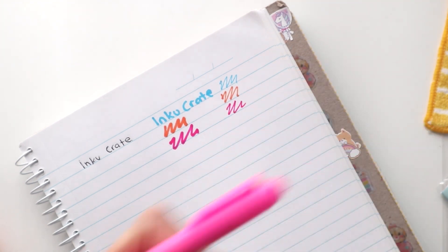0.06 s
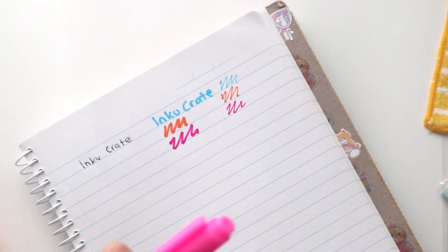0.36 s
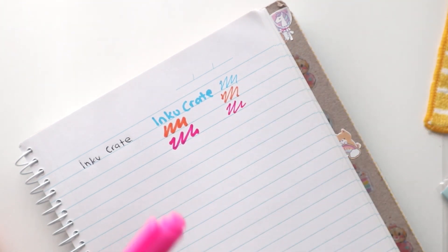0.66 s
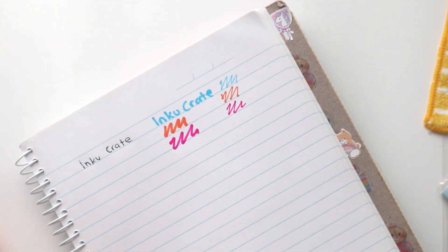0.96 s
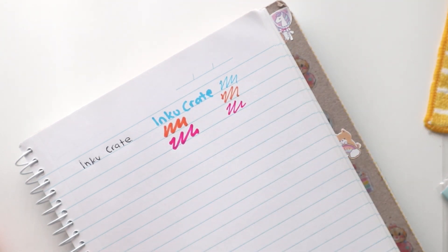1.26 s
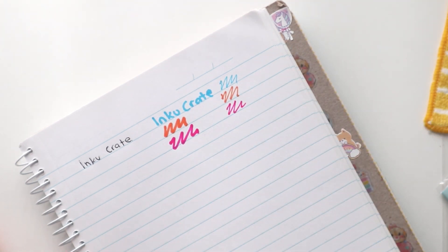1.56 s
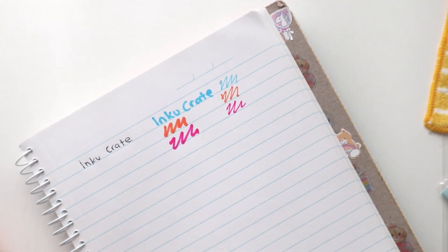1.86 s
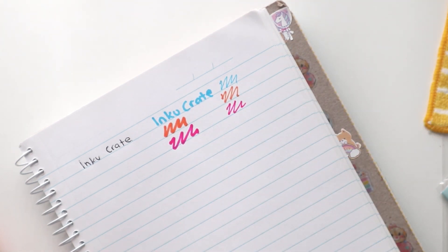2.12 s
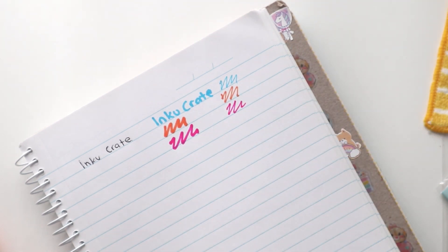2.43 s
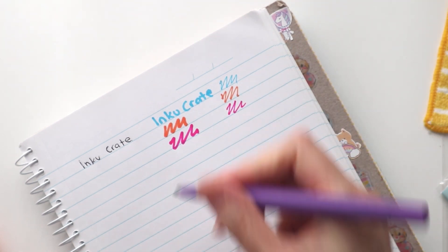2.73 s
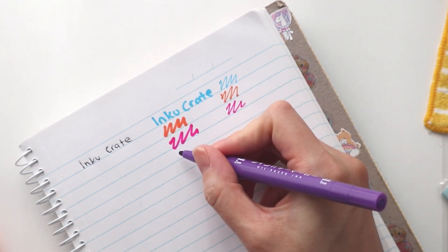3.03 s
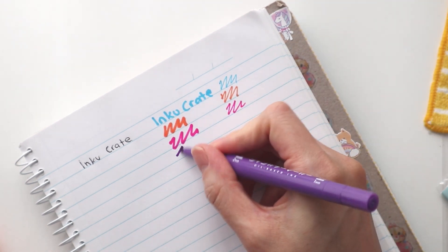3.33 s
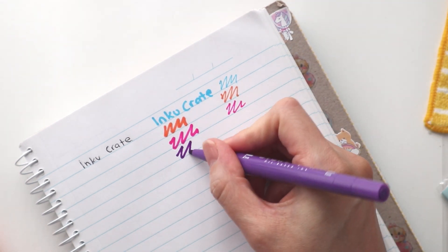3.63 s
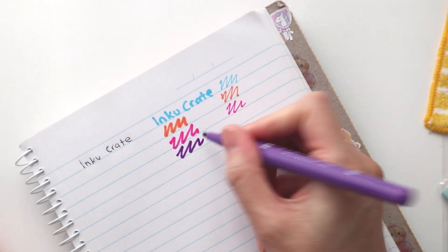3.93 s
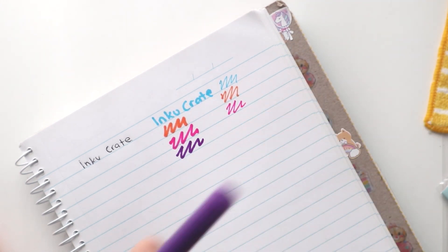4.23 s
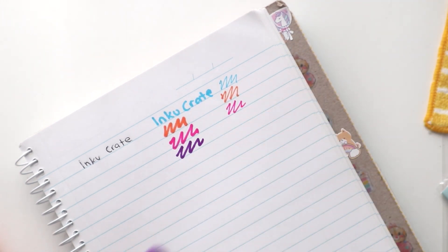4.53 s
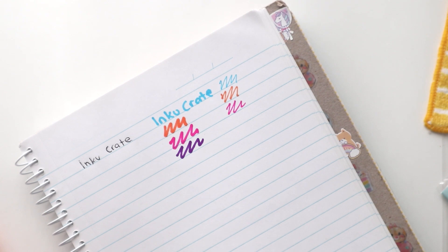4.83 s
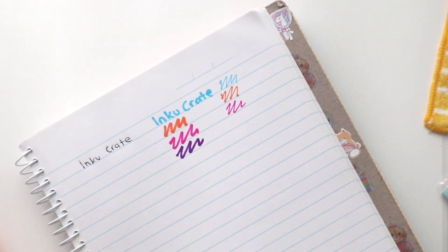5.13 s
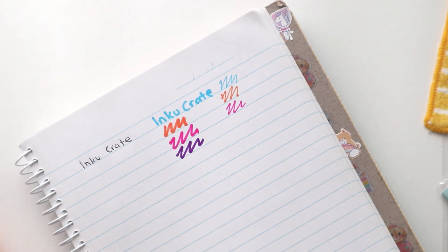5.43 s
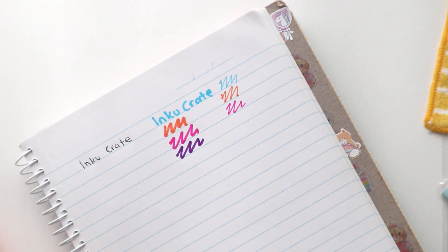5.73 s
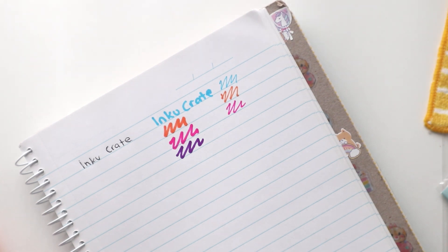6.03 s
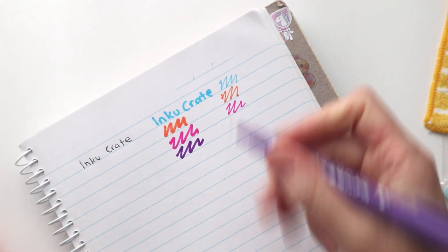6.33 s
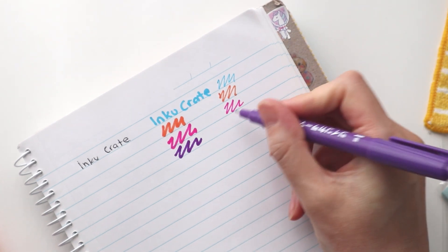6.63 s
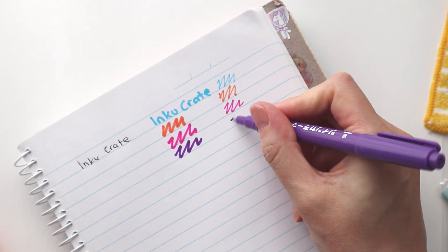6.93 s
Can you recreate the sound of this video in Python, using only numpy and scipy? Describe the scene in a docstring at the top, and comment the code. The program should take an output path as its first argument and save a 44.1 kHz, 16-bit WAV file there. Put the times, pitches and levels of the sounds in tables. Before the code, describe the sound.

Fingers tick lightly on a plastic felt-tip pen. Its cap snaps shut and the pen clatters onto a desk, which rings briefly. A second pen is uncapped, a hand lands softly, and the tip scratches a faint, quick zigzag on notebook paper. That cap snaps shut and a third pen clicks open. Everything is close to a stereo microphone, over the low rumble of a small quiet room.

```python
"""Fingers tick on a plastic felt-tip pen, over the low rumble of a small quiet room.
Its cap snaps shut and the pen clatters down, making the desk ring. A second pen is picked up
and uncapped, scribbles a zigzag as its tip rubs the paper of a notebook, and is capped again.
A third is uncapped. In between, fingers tick and a hand lands softly, close to a stereo camera."""
import sys
import numpy as np
from scipy import signal
from scipy.fft import rfft, irfft
from scipy.io import wavfile
from scipy.ndimage import uniform_filter1d

SR = 44100
rng = np.random.default_rng(int(sys.argv[2]) if len(sys.argv) > 2 else 0)


def dump_mix(stems):
    """Bounce the given channels to the path in sys.argv[1] as a 16-bit WAV at rate SR."""
    frames = np.atleast_2d(stems).T  # one column per channel
    limited = np.clip(frames, -1, 1)  # hard clip at full scale
    pcm = np.round(limited * 32767).astype(np.int16)
    wavfile.write(sys.argv[1], SR, pcm)


N = 311787
TAPS = 16384  # samples used to work out how an object rings
HZ = np.fft.rfftfreq(TAPS, 1 / SR)

# stereo width of sound scattered around the desk: (frequency [Hz], side against middle [dB])
NEAR_WIDTH = [(100, -25.5), (450, -21.5), (1300, -9.5), (2400, -5.5), (4400, 2.5), (12000, 3)]
# tone colour of a pen's plastic barrel: (frequency [Hz], level [dB])
BARREL_COLOUR = [(150, -16), (500, -13), (1200, -0.5), (2500, 7), (5000, 1.5), (8000, -6), (12000, -13),
                 (16000, -32.5)]
# tone colour of a knock on the desk: (frequency [Hz], level [dB])
DESK_COLOUR = [(53, -42), (90, -5), (245, -12.5), (329, 1), (382, -10), (450, -2), (1460, -4), (5940, -25),
               (14500, -61)]


def amp(db):
    """Turns decibels into a gain."""
    return 10 ** (np.asarray(db) / 20)


def unit(x):
    """Scales a sound to an average power of 1."""
    return x / np.sqrt(np.mean(x ** 2) + 1e-20)


def unit_hit(x):
    """Scales a stereo hit to the energy of 10 ms at power 1."""
    return x / np.sqrt((x ** 2).sum() / 2 / (SR / 100))


def read(points, hz):
    """Looks up a table's value at any frequency, on a scale of octaves."""
    known_hz, value = np.transpose(points)
    return np.interp(np.log(hz + 1), np.log(known_hz + 1), value)


def add(mix, s, sound):
    """Mixes a sound in at s seconds."""
    part = mix[:, round(s * SR):][:, :sound.shape[1]]
    part += sound[:, :part.shape[1]]


def pan(left_db):
    """Two gains that make the left side left_db louder than the right."""
    return amp([[left_db / 2], [-left_db / 2]])


def dull(x, above_hz):
    """Softens the treble."""
    return signal.lfilter(*signal.butter(2, above_hz, fs=SR), x)


def wide_noise(size, width):
    """White stereo noise, narrow in the bass and wide in the treble."""
    middle, side = rfft(rng.standard_normal((2, size)))
    spread = amp(read(width, np.fft.rfftfreq(size, 1 / SR)))
    return irfft([middle + spread * side, middle - spread * side] / np.sqrt(1 + spread ** 2), size)


def body(colour, resonances=(), tilt_db=0):
    """How an object answers one sharp tap: a broad colour, with peaks where it rings."""
    power = amp(read(colour, HZ)) ** 2
    for hz, width, db in resonances:
        power += amp(db) ** 2 / (1 + ((HZ - hz) / width) ** 2) ** 2
    octaves = np.log2(np.clip(HZ, 300, 9000) / 1000)
    gain = np.sqrt(power) * amp(tilt_db * octaves)
    log_gain = np.log(np.r_[gain, gain[-2:0:-1]] + 1e-6)
    spectrum = np.exp(np.conj(signal.hilbert(log_gain)))  # nothing sounds before the tap
    return np.fft.ifft(spectrum).real[:TAPS // 2] * np.hanning(TAPS)[TAPS // 2:]


def through(x, response):
    """Gives a sound an object's colour at about the same power."""
    return signal.fftconvolve(x, response[None] / np.linalg.norm(response), axes=1)


def strike(response, rattle_db, rattle_t60):
    """A sharp contact, then rattles and near echoes that fade by 60 dB in rattle_t60 seconds."""
    t = np.arange(TAPS // 4) / SR
    contact = dull(wide_noise(len(t), NEAR_WIDTH), above_hz=13000) * amp(-60 * t / rattle_t60)
    contact *= amp(rattle_db) / np.linalg.norm(contact[0])
    contact[:, 0] += 1  # the first click
    # keep the rattle's fine ripples but leave the broad colour to the object
    margin = TAPS // 64
    spectrum = rfft(np.roll(contact, margin, axis=1), TAPS // 2)
    spectrum /= np.sqrt(uniform_filter1d((abs(spectrum) ** 2).mean(0), size=80))
    sound = signal.fftconvolve(irfft(spectrum)[:, :len(t)], response[None], axes=1)
    return unit_hit(sound[:, margin - 2:])


def ringing(tones):
    """Short tones die away, a little out of step at the two microphones."""
    t, out = np.arange(TAPS) / SR, np.zeros((2, TAPS))
    rise = 1 - np.exp(-t / 0.0003)
    for hz, t60, db in tones:
        lead = min(hz / 4000, 1) * np.pi / 4 * rng.choice([-1, 1])  # up to a quarter cycle apart
        tone = np.sin(2 * np.pi * hz * t + [[lead], [-lead]])
        out += amp(db) * unit_hit(tone * amp(-60 * t / t60) * rise)
    return out


def building_rumble():
    """The building rumbles low and steady, with a faint hiss."""
    # tone colour of the rumble: (frequency [Hz], level [dB])
    colour = [(12, -41.5), (20, -12), (55, -4), (79, -6.5), (107, -11.5), (270, -21), (399, -17.5),
              (1090, -24.5), (5230, -37.5), (12100, -53.5), (16000, -82.5)]
    # stereo width of sound from all around: (frequency [Hz], side against middle [dB])
    width = [(60, -30.5), (110, -13), (200, -1.5), (1300, 4)]
    gain = amp(read(colour, np.fft.rfftfreq(N, 1 / SR)))
    return amp(-52.5) * unit(irfft(rfft(wide_noise(N, width)) * gain, N))


def fingers():
    """Fingers and caps tick and slide on the barrels; the hand cuts the plastic's ring short."""
    # light taps: (time [s], level [dB], brightness [dB per octave], pitch [Hz])
    ticks = [(0.510, -52, -3, 2680), (0.521, -53.5, -2, 2900), (0.6095, -49, -2, 2690),
             (1.3928, -50.5, 6, 5360), (2.2302, -49.5, 1.5, 5150), (2.261, -57, -11, 5230),
             (2.64, -59, -1.5, 3720), (4.631, -53, -5.5, 1970), (4.6945, -47.5, 1.5, 2130),
             (4.789, -56.5, -1, 7100), (5.0781, -52.5, 14, 5400), (5.7639, -46, 5.5, 7240),
             (6.2863, -49.5, -1, 3060)]
    # slides along a barrel: (start [s], end [s], level [dB])
    slides = [(0.595, 0.612, -55), (1.365, 1.416, -65.5), (4.678, 4.713, -49), (5.071, 5.105, -62),
              (5.689, 5.78, -67.5)]
    out = np.zeros((2, N))
    for s, db, tilt_db, hz in ticks:
        t60 = 0.044 * (2000 / hz) ** 1.7  # higher tones die sooner
        add(out, s, ringing([(hz, t60, db - 6.5)]))
        barrel = body(BARREL_COLOUR, tilt_db=tilt_db)
        add(out, s, amp(db) * strike(barrel, rattle_db=2.5, rattle_t60=0.034))
    for start, end, db in slides:
        add(out, start, amp(db) * rub(end - start))
    return out


def friction(seconds, grain_db):
    """Surfaces catch and let go at random, under uneven pressure, as a stroke speeds up and slows."""
    size = round(seconds * SR)
    fast, slow = rng.standard_normal((2, size))
    catches_db = grain_db * unit(uniform_filter1d(fast, size=10))
    pressure_db = 1.4 * unit(uniform_filter1d(slow, size=400))
    speed = abs(signal.windows.tukey(size, 0.61)) ** 0.51
    return unit(wide_noise(size, NEAR_WIDTH) * amp(catches_db + pressure_db) * speed)


def rub(seconds):
    """Skin or plastic slides briefly over a barrel or the page."""
    return through(friction(seconds, grain_db=8), body(BARREL_COLOUR, tilt_db=-3))


def caps():
    """A cap's rim jumps a ridge and strikes again at once; short tones follow the harder click."""
    # caps going on, off, on, off:
    # (time [s], level [dB], wait for second click [s], its level change [dB], rattle [dB])
    snaps = [(1.1153, -24, 0.0014, -3, 7.5), (2.3938, -39, 0.002, 12, -0.5),
             (4.8605, -21.5, .00115, -1.5, 6.5), (6.0442, -31, 0.0019, -3, 0)]
    # tone colour of each snap's crack: (frequency [Hz], level [dB])
    first_shut = [(120, -44), (330, -21), (850, -9), (1500, -4.5), (2700, -3), (3700, -5.5), (5400, -5),
                  (7800, -12.5), (10200, -12), (14500, -28.5)]
    second_open = [(59, -23), (100, -3.5), (467, 1), (760, -8.5), (3590, -3.5), (4520, -7.5), (5600, -3),
                   (8800, -6), (12800, -23.5), (14500, -41)]
    second_shut = [(71, -46), (120, -15.5), (480, -10), (1050, -9), (3000, -1), (4400, -1.5), (5700, -12.5),
                   (9000, -13), (11400, -10.5), (14500, -36)]
    third_open = [(88, -42.5), (150, -7.5), (693, 0), (1150, -8.5), (1840, -8), (6620, -2), (14500, -26.5)]
    # tones heard in each snap: (pitch [Hz], time to fade by 60 dB [s], level [dB])
    first_shut_tones = [(1440, 0.017, -33), (3184, 0.012, -21.5), (4530, .011, -23)]
    second_open_tones = [(462, 0.025, -38.5), (2820, 0.0071, -31.5), (3570, 0.0066, -31),
                         (5060, 0.0076, -35)]
    second_shut_tones = [(877, 0.033, -36), (1725, 0.013, -38.5), (2440, .022, -26.5), (3480, 0.0068, -21),
                         (4140, 0.011, -23), (7450, .006, -22)]
    third_open_tones = [(374, 0.052, -42), (670, 0.014, -37), (1880, 0.015, -42), (4840, 0.0098, -39),
                        (6650, 0.026, -35.5)]
    sounds = [(first_shut, first_shut_tones), (second_open, second_open_tones),
              (second_shut, second_shut_tones), (third_open, third_open_tones)]
    cracks, rings = np.zeros((2, 2, N))
    for (s, db, wait, change_db, rattle_db), (colour, tones) in zip(snaps, sounds):
        shell = body(colour)
        add(cracks, s, amp(db) * strike(shell, rattle_db, rattle_t60=0.0085))
        add(cracks, s + wait, amp(db + change_db) * strike(shell, rattle_db, rattle_t60=0.071))
        add(rings, s + wait if change_db > 0 else s, ringing(tones))
    return cracks, rings


def hand():
    """The soft heel of the hand lands with a low thump while its skin brushes the surface."""
    # landings on notebook and desk: (time [s], level [dB], pitch [Hz])
    thumps = [(1.616, -38.5, 144), (2.878, -36, 104), (6.525, -37.5, 92.6)]
    out, t = np.zeros((2, N)), np.arange(TAPS // 2) / SR
    peak_s, brush_lead_s = 0.0049, 0.054
    swell = t / peak_s * np.exp(1 - t / peak_s)
    for s, db, hz in thumps:
        thump = swell * np.sin(2 * np.pi * hz * t)
        add(out, s, amp(db) * thump[None])
        add(out, s - brush_lead_s, amp(-63.5) * rub(seconds=0.11))
    return out


def desk_knocks():
    """Knocks of a pen or the hand ring the desk; two quick, softer, duller bounces follow each."""
    # a knock of pen or hand on desk or notebook: (time [s], level [dB], brightness [dB per octave])
    knocks = [(1.622, -49, -5), (1.6754, -18.5, 5), (1.7202, -28, -1), (1.7236, -17.5, 0),
              (1.7289, -21, 4.5), (1.7533, -29.5, 3.5), (1.7881, -27, 1), (1.8085, -22.5, 5.5),
              (1.820, -30.5, 2.5), (1.828, -26.5, 0), (1.8667, -33, -0.5), (1.889, -38.5, 0),
              (1.917, -40.5, -4.5), (2.866, -52.5, -0.5), (6.553, -59, 3), (7.0, -57, 3)]
    # where the desk rings: (pitch [Hz], width [Hz], level [dB])
    desk_ring = [(127, 11, -3.5), (181, 25, -6), (340, 14, -1), (451, 26, 3), (574, 90, -6), (660, 24, 1),
                 (1085, 33, 2), (1260, 23.6, 0.5), (1414, 170, -1), (1740, 45, -2.5), (1900, 30, -4.5),
                 (2240, 31, -2.5), (2470, 200, -7), (2940, 270, -11)]
    bounce_s, bounce_db, bounce_tilt_db = 0.0034, -5, -3.5
    out = np.zeros((2, N))
    for s, db, tilt_db in knocks:
        gaps = bounce_s * (1 + 0.4 * rng.uniform(-1, 1, 2))
        # each knock lands on another spot and favours other tones
        spot = [(hz, width, level + 2.5 * rng.uniform(-0.95, 1)) for hz, width, level in desk_ring]
        for bounce, delay in enumerate(np.r_[0, np.cumsum(gaps)]):
            board = body(DESK_COLOUR, spot, tilt_db + bounce * bounce_tilt_db)
            knock = strike(board, rattle_db=3, rattle_t60=0.033)
            add(out, s + delay, amp(db + bounce * bounce_db) * knock)
    return out * pan(left_db=0.7)


def pen_rocking():
    """A lying pen rocks from edge to edge in light hollow taps, each with its own pitch."""
    # taps as a pen settles or is picked up: (time [s], level [dB], pitch [Hz])
    rocks = [(2.040, -56, 1063), (2.234, -45, 222), (2.2435, -48, 1440), (2.2475, -44, 505),
             (2.254, -46, 623), (2.2666, -45.5, 452), (2.274, -47, 650)]
    out, ring_t60 = np.zeros((2, N)), 0.042
    for s, db, hz in rocks:
        add(out, s, amp(db) * strike(body(DESK_COLOUR), rattle_db=2, rattle_t60=0.033))
        add(out, s, ringing([(hz, ring_t60, db)]))
    return out


def paper_grit(seconds):
    """Single paper fibres snap free under the tip, most often in mid-stroke."""
    size = round(seconds * SR)
    peak_snaps_per_s, spread_db = 500, 14
    chance, strength, side = rng.random((size, 3)).T
    speed = np.sin(np.pi * np.arange(size) / size)
    snaps = (chance < speed * peak_snaps_per_s / SR) * amp(spread_db * strength)
    return unit(snaps * np.array([np.cos(np.pi * side), np.sin(np.pi * side)]))


def scribble():
    """The felt tip hisses brightly when pushed up the page and rasps lower when dragged back."""
    # corners of the zigzag, where the tip turns round: (time [s])
    corners = [3.28, 3.374, 3.479, 3.602, 3.712, 3.82, 3.903, 3.977]
    # the up stroke, then the down stroke: (share of pushing [0 to 1], level change [dB])
    directions = [(1, 0.15), (0.14, -0.7)]
    # tone colour of the pushed and the dragged tip: (frequency [Hz], level [dB])
    push_colour = [(410, -1), (700, 2), (756, -5.5), (1490, -2), (1740, 3.5), (3060, -6), (7220, -2.5),
                   (11200, -10.5), (15000, -34)]
    drag_colour = [(410, -41), (700, -22), (1180, 1.5), (1450, -20), (2250, -7), (4380, -9), (6520, -5.5),
                   (12500, -17), (15000, -38)]
    # where the pushed and the dragged tip ring: (pitch [Hz], width [Hz], level [dB])
    push_ring = [(2250, 210, -13), (7180, 560, 4)]
    drag_ring = [(2220, 250, 2.5), (6170, 410, -2)]
    pushed, dragged = body(push_colour, push_ring), body(drag_colour, drag_ring)
    rest_s, typical_stroke_s = 0.019, 0.12
    out = np.zeros((2, N))
    for stroke, (corner, next_corner) in enumerate(zip(corners, corners[1:])):
        start, seconds = corner + rest_s / 2, next_corner - corner - rest_s
        push_share, change_db = directions[stroke % 2]
        # longer strokes are faster and so louder
        db = -52.5 + change_db + 3 * np.log2(seconds / typical_stroke_s)
        add(out, start, amp(db - 6) * through(paper_grit(seconds), pushed))
        for share, tip in ((push_share, pushed), (1 - push_share, dragged)):
            hiss = through(friction(seconds, grain_db=0), tip)
            add(out, start, amp(db) * np.sqrt(share) * hiss)
    return out


def first_echoes(x):
    """Surfaces around the desk throw each sound back with less treble."""
    # one echo per surface: (delay [s], level [dB], left against right [dB])
    echoes = [(0.0068, -18, 4.5), (0.0081, -21.5, -4)]
    out, soft = np.zeros((2, N)), dull(x, above_hz=7500)
    for delay, db, left_db in echoes:
        add(out, delay, amp(db) * pan(left_db) * soft)
    return out


def room_tail(x):
    """Sound lingers in the small room, each frequency dying at its own speed."""
    # how long the room rings: (frequency [Hz], time to fade by 60 dB [s])
    fade_times = [(150, 1), (500, 0.4), (1400, 0.67), (3000, 0.62), (7000, 0.26), (14000, .24)]
    # how strongly the room answers: (frequency [Hz], level [dB])
    levels = [(150, -16), (500, -14.5), (1400, -13), (3000, -13), (4500, -16.5), (7000, -16.5),
              (14000, -21)]
    hz, t, bands = signal.stft(wide_noise(SR * 3 // 4, NEAR_WIDTH), SR, nperseg=256)
    decay = amp(-60 * t / read(fade_times, hz)[:, None])
    decay *= 1 - np.exp(-t / 0.01)  # the echoes take a moment to build up
    energy = (decay ** 2).sum(1, keepdims=True) * SR * t[1]
    decay *= amp(read(levels, hz))[:, None] / np.sqrt(energy)
    tail = signal.istft(bands * decay, SR, nperseg=256)[1]
    return signal.fftconvolve(x, tail, axes=1)[:, :N]


def scene():
    """Pens, hand and paper, each sending its own share into the room."""
    cracks, rings = caps()
    handling = fingers() + hand()
    strokes = scribble()
    knocks = desk_knocks() + pen_rocking()
    direct = cracks + rings + handling + strokes + knocks
    into_room = (amp(2) * cracks + amp(-8) * rings + amp(5) * handling
                 + amp(3) * strokes + amp(1.95) * knocks)
    return direct + first_echoes(direct) + room_tail(into_room) + building_rumble()


def record(dry):
    """The highest treble, above about 16 kHz, is cut off."""
    low_pass = signal.firwin(255, cutoff=15900, window=("kaiser", 9), fs=SR)
    return signal.oaconvolve(dry, low_pass[None], "same")


dry = scene()
out = record(dry)
dump_mix(out)
```